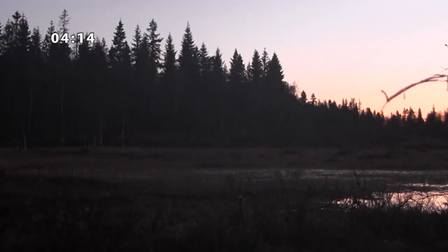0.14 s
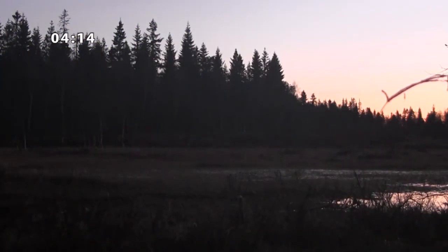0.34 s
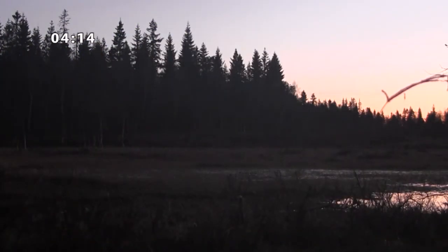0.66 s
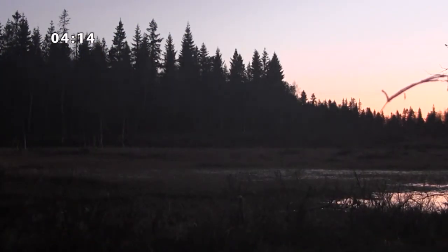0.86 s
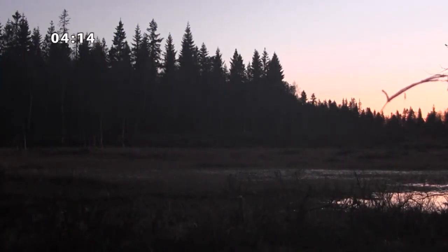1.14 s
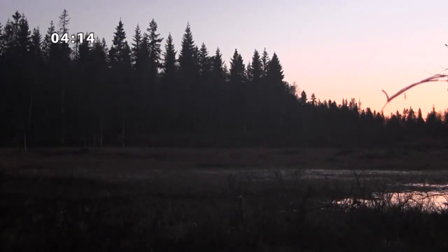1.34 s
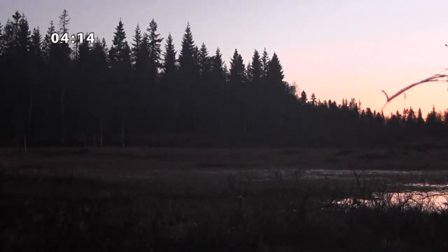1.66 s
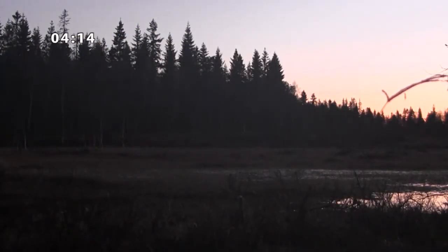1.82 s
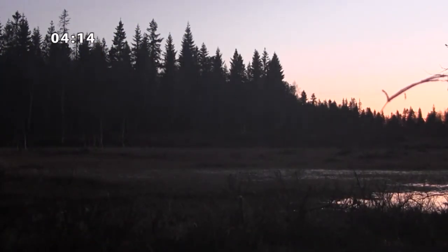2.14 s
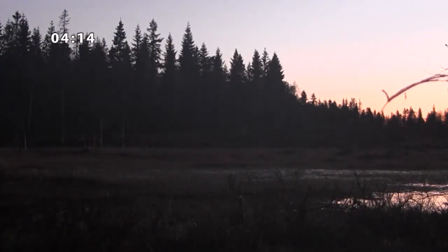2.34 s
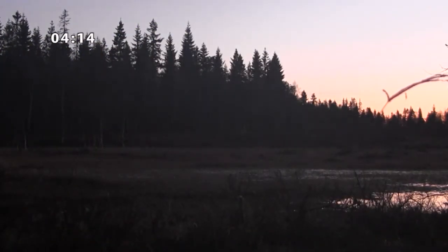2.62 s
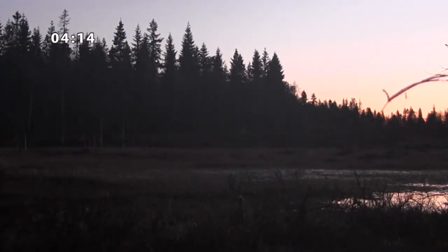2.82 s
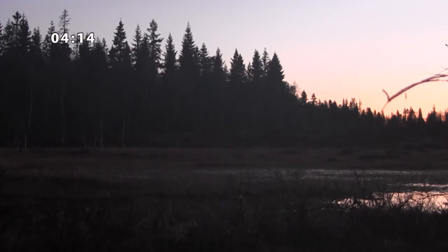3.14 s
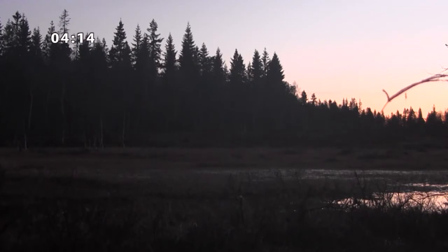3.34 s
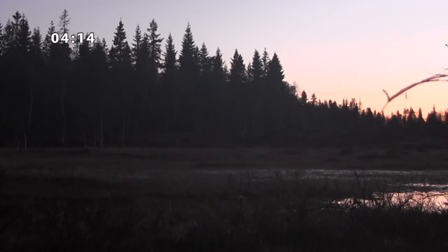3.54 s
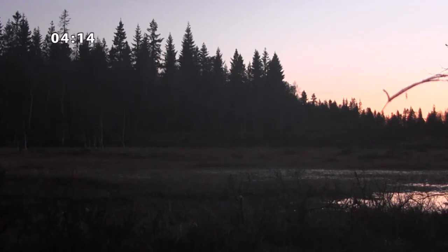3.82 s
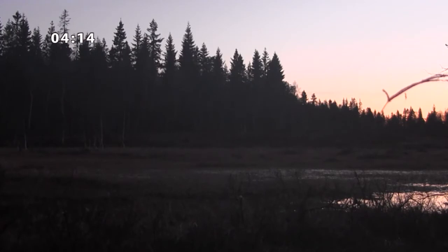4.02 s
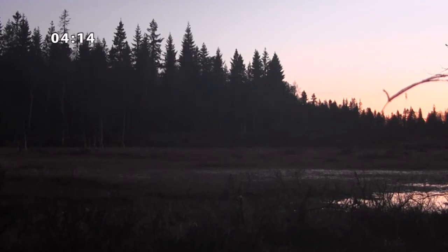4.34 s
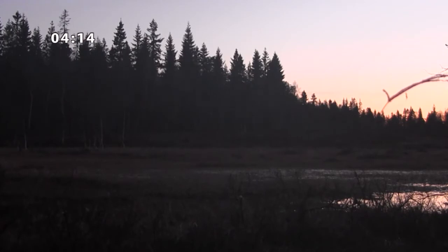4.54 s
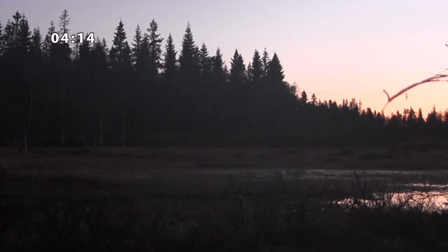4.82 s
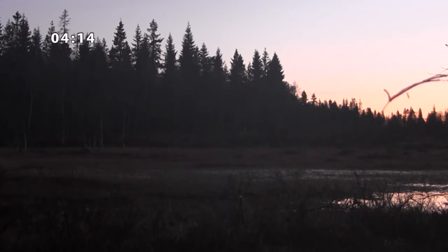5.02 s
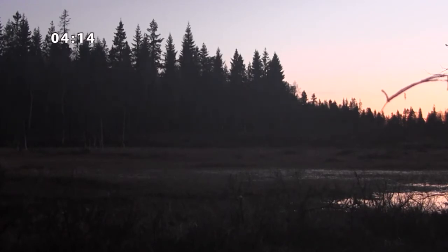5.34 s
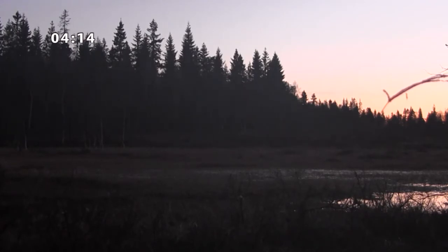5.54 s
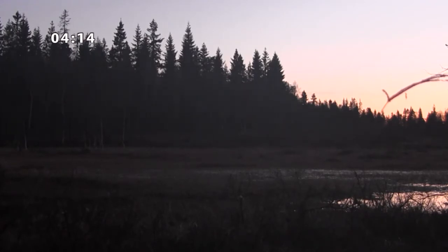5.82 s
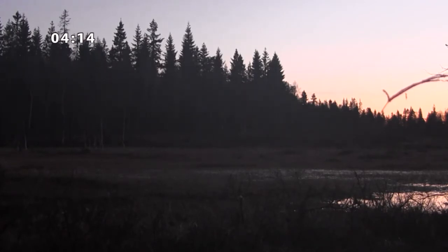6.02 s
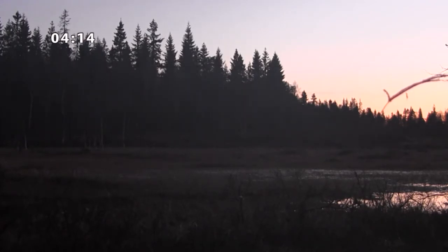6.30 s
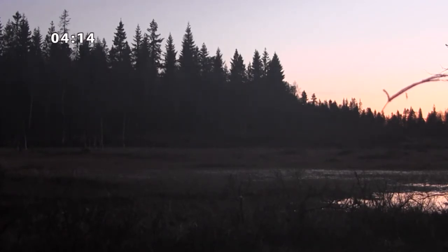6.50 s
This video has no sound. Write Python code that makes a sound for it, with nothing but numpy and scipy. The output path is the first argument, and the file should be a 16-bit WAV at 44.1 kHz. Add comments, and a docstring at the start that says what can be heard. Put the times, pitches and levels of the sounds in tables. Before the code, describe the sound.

Wide open bog at dawn beside a forest edge. Songbirds whistle, chip and trill on both sides over a murmur of distant birds, with black grouse bubbling low and very faint. A breathy grouse hiss swells and fades after two seconds; the chorus thins. Later three rapid double wing claps, then a loud harsh rasp and a shorter, weaker one at the end. Thin, bass-light stereo microphones with slight hiss and woodland echo.

```python
"""An open bog at dawn. Black grouse bubble far off: wavering tones that follow a curve of pitch.
Songbirds whistle, chip and trill from the forest edge, over a murmur and bursts of filtered noise with twitters.
A noise hiss swells and fades, wings clap three times as double bursts of noise,
and two harsh rasping calls sound nearer by: uneven slaps that ring throat resonances.
Trees scatter the voices and claps back; the microphone pair is thin in the bass and hisses faintly."""
import sys
import numpy as np
from scipy import signal
from scipy.fft import rfft, irfft
from scipy.io import wavfile
from scipy.ndimage import uniform_filter1d

SR = 44100
rng = np.random.default_rng(int(sys.argv[2]) if len(sys.argv) > 2 else 0)


def to_wav(sig):
    """Store sig (one row per channel, or 1-D mono) as 16-bit WAV at the path in sys.argv[1].

    Samples outside -1..1 are clipped; the rate is SR.
    """
    pcm = np.clip(np.atleast_2d(sig), -1, 1) * 32767
    pcm = np.round(pcm).astype(np.int16)
    wavfile.write(sys.argv[1], SR, pcm.T)  # frames by channels


N = 294147
TIME = np.arange(N) / SR

# How far the left microphone leads the right one in phase.
# Each row: frequency in Hz, lead in radians.
PORT_PHASE = [(2000, -0.17), (4300, 2), (12000, 5.5)]
# Bursts of noise in a band: far blurred calls, hiss around the wing claps, low hiss around the rasps.
# Each row: start in seconds, length in seconds, lowest Hz, highest Hz, level in dB.
BAND_BURSTS = [(0.935, 0.22, 4410, 4840, -52), (1.218, 0.28, 3830, 4280, -50.5),
               (1.576, 0.73, 2425, 3740, -51), (2.76, 0.62, 2365, 3930, -43), (3.081, 0.9, 1839, 2125, -55),
               (3.069, 0.45, 3880, 4600, -51), (3.19, 0.99, 3300, 3670, -49.5),
               (3.657, 0.81, 2523, 3070, -47), (4.082, 0.91, 1037, 1570, -62.5),
               (4.45, 0.39, 1890, 5530, -44.5), (4.822, 0.16, 2920, 3750, -49),
               (4.994, 0.29, 2370, 4630, -44), (5.42, 0.27, 2430, 2600, -48),
               (5.955, 0.64, 2620, 6806, -48), (6.21, 0.57, 3758, 4390, -49),
               (6.081, 0.95, 1130, 1626, -55.5)]

# Grouse: a coo lifts quickly from a low note, holds, then drops back to it
COO_RISE_S, COO_DROP_S = 0.013, 0.0373
COO_END_HZ = 514.5  # before the pitch factor of each phrase
COO_DB, COO_GROWTH_DB_PER_S = -57.5, 0.2  # the phrase grows a little louder as it goes
# the rest of the lek, bubbling far away
BUBBLES_PER_S, BUBBLE_S = 9, 0.0497
BUBBLE_DB, BUBBLE_SPREAD_DB = -69, -2
BUBBLE_LOW_HZ, BUBBLE_HIGH_HZ = 523.6, 647.3

# Songbirds: the fainter a note, the more of it arrives scattered by the trees
NEAR_DB, FAR_DB, FAR_SCATTER, SCATTER_S = -34.5, -42, 0.45, 0.067
FAR_WAVER = 0.0067  # far whistles also waver more in pitch
WHISTLE_ROUNDNESS = 0.75
SWELL_DB, SWELL_DB_PER_HZ = 3, 0.05  # rising whistles swell the most
# a chip dives to this share of its pitch; a long one then hooks back up
CHIP_LOW, CHIP_TURN_S, CHIP_SWELL_DB = 0.73, 0.036, -3.5
# a trill narrows, rises and swells as it goes
TRILL_NARROWING, TRILL_RISE_HZ, TRILL_SWELL_DB = 0.46, 91.3, 1.5

# Single notes in the band of each noise burst
TWITTER_PER_S, TWITTER_S, TWITTER_GLIDE, TWITTER_DB = 16, 0.0393, 0.046, -1.5

# The long hiss swells, holds and dies away
HISS_START_S, HISS_ATTACK_S, HISS_HOLD_S, HISS_RELEASE_S = 2.157, 0.18, 0.24, 0.24
HISS_DB = -32.5

# Each wing beat is a double clap
CLAP_GAP_S, FIRST_CLAP_DB, FIRST_DECAY_S, SECOND_DECAY_S = 0.023, -2.5, 0.014, 0.013

# Rasps: the membranes slap unevenly
RASP_PULSE_HZ, RASP_JITTER, THROAT_HALF_WIDTH_HZ = 172, 0.2463, 149
RASP_RUSH = 0.065  # turbulence between the slaps, per sample, against a slap of 1
RASP_DB, RASP_RELEASE_S = 0, 0.0062
# the upper resonances fade as the throat sinks below its open pitch
OPEN_HZ, UPPER_DB_PER_HZ = 1792, 0.06
# the second throat resonance (at the open pitch) follows the first; the third stays put
UPPER_HZ, UPPER_FOLLOWS, TOP_HZ, TOP_DB = 2183, 0.408, 2755, -18.5
SKIRT_DB_PER_HZ = -0.0231  # the rasp's skirt of hiss grows as the throat sinks

EDGE_HZ = 15850  # the sound stops above this


def gain_of(db):
    """Decibels to gain."""
    return 10 ** (np.asarray(db) / 20)


def evened(x):
    """Scales to rms 1."""
    return x / np.sqrt(np.mean(abs(x) ** 2) + 1e-20)


def read(points, hz):
    """Reads a curve between its points on a log-frequency axis."""
    f, value = np.transpose(points)
    return np.interp(np.log(hz + 1), np.log(f + 1), value)


def add(mix, s, sound):
    """Mixes a stereo sound in at time s, cutting off what falls outside."""
    at = round(s * SR)
    sound = sound[:, max(-at, 0):]
    part = mix[:, max(at, 0):][:, :sound.shape[1]]
    part += sound[:, :part.shape[1]]


def wander(size, hz):
    """Smooth random drift, mostly slower than hz, with rms 1 over a second."""
    f = np.fft.rfftfreq(SR, 1 / SR)
    slow = rfft(rng.standard_normal(SR)) / (1 + (f / hz) ** 4)
    return evened(irfft(slow))[:size]


def place(analytic, pan_db, lag_rad=0):
    """Puts a complex tone on the two microphones with a level and phase difference."""
    loudness = evened(gain_of([pan_db / 2, -pan_db / 2]))
    sides = loudness * np.exp(.5j * np.array([lag_rad, -lag_rad]))
    return np.sqrt(2) * (sides[:, None] * analytic).real


def port_lag(hz, pan_db, delay_s=7e-5):
    """Phase between the microphones for a bird on one side: a fixed delay turns faster at high pitch."""
    return -2 * np.pi * hz * delay_s * np.tanh(pan_db / 2)


def noise(colour, patchy_db=0, likeness=1):
    """Stereo noise of rms 1 with a given spectrum and drifting narrow patches."""
    # How alike left and right are, before the factor "likeness".
    # Each row: frequency in Hz, likeness from 0 to 1.
    likeness_curve = [(600, 0.68), (2500, 0.18)]
    frames, hz = N // 256 + 5, np.fft.rfftfreq(1024, 1 / SR)
    a, b, c, d, patches = rng.standard_normal((5, frames, len(hz)))
    patches = uniform_filter1d(patches, size=14, axis=0)  # smooth in time
    patches = evened(uniform_filter1d(patches, size=5, axis=1))  # and in pitch
    same = np.clip(likeness * read(likeness_curve, hz), 0, .98)
    left = a + 1j * b
    right = same * left + np.sqrt(1 - same ** 2) * (c + 1j * d)
    right = right * np.exp(-1j * read(PORT_PHASE, hz))
    below_db = 14 * np.minimum(np.log2((hz + 1) / colour[0][0]), 0)  # falls away under the lowest point
    z = np.array([left, right]) * gain_of(read(colour, hz) + below_db + patchy_db * patches)
    sound = signal.istft(z, nperseg=1024, noverlap=768, time_axis=-2, freq_axis=-1)[1]
    return evened(sound[:, :N])


def level(rows):
    """A dB curve as a gain for every sample."""
    return gain_of(np.interp(TIME, *np.transpose(rows)))


def arch(size, start, middle, end):
    """A smooth pitch sweep through three points."""
    return np.polyval(np.polyfit([0, .5, 1], [start, middle, end], 2), np.linspace(0, 1, size))


def syllable(hz, swell_db=0, roundness=1, jitter=0.0048, flutter_db=2):
    """A nearly pure, slightly unsteady tone that follows a pitch curve; it grows and fades like a spindle."""
    size = len(hz)
    turns = np.cumsum(hz * (1 + jitter * wander(size, 126))) / SR
    progress = np.linspace(-.5, .5, size)
    spindle = abs(np.cos(np.pi * progress)) ** roundness
    shape = spindle * gain_of(swell_db * progress + flutter_db * wander(size, 50))
    return evened(shape) * np.exp(2j * np.pi * turns)


def coo(length, top_hz, end_hz):
    """One hollow note that lifts to its top, holds and drops away."""
    t = np.arange(0, length, 1 / SR)
    drop_s = min(COO_DROP_S, length - COO_RISE_S)
    sag = np.maximum(1 - t / COO_RISE_S, 0) ** 2 + np.maximum(1 - (length - t) / drop_s, 0) ** 2
    return syllable(top_hz + (end_hz - top_hz) * sag, roundness=0.73, flutter_db=4.0)


def grouse(drop=0.872):
    """Near and far cocks run through the same phrase of coos, over the random bubbling of the others."""
    # The phrases of near and far cocks. Each row: start in seconds, level in dB against the usual coo,
    # pitch factor, slowness factor, left-right difference in dB.
    phrases = [(-.615, 3.5, .975, 1, 7), (1.39, -10, .8, 1, 0), (2.21, -3.5, .94, 1.04, 0),
               (3.84, .5, 1, 1, 8)]
    # The coos of the bubbling phrase. Each row: seconds into the phrase (before the slowness factor),
    # length in seconds, top pitch in Hz (before the pitch factor).
    phrase_coos = [(.005, 0.04, 613), (0.066, .057, 682), (0.131, .05, 700), (0.197, .032, 698),
                   (0.464, 0.052, 673), (0.579, .032, 703), (0.701, .062, 665), (0.791, .046, 589),
                   (0.867, 0.046, 682), (0.896, .135, 630.4), (1.205, .053, 672.4), (1.285, .032, 698),
                   (1.372, 0.059, 607.5), (1.459, .048, 630), (1.517, .062, 667), (1.705, 0.049, 610.5)]
    out = np.zeros((2, N))
    for start, far_db, factor, slowness, pan_db in phrases:
        for s, length, top_hz in phrase_coos:
            db = COO_DB + COO_GROWTH_DB_PER_S * s + far_db
            note = coo(length, factor * top_hz, factor * COO_END_HZ)
            add(out, start + slowness * s, gain_of(db) * place(note, pan_db, -1.97))
    chances = rng.random((round(BUBBLES_PER_S * N / SR), 4))
    for k, (when, height, strength, side) in enumerate(chances):
        top_hz = BUBBLE_LOW_HZ + (BUBBLE_HIGH_HZ - BUBBLE_LOW_HZ) * height
        db = BUBBLE_DB + BUBBLE_SPREAD_DB * (2 * strength - 1)
        note = coo(BUBBLE_S, top_hz, drop * top_hz)
        add(out, (k + when) / BUBBLES_PER_S, gain_of(db) * place(note, 10 * side, -np.pi * side))
    return out


def farness(db):
    """0 for a loud, near note, 1 for a faint, far one."""
    return np.clip((db - NEAR_DB) / (FAR_DB - NEAR_DB), 0, 1)


def from_trees(note, hz, db, pan_db):
    """A note as it arrives: partly direct, partly smeared by the branches on its way."""
    direct = gain_of(db) * place(note, pan_db, port_lag(hz, pan_db))
    age = np.arange(SR // 5) / SR
    branches = rng.standard_normal((2, len(age))) * np.exp(-age / SCATTER_S)
    smear = signal.fftconvolve(direct, branches, axes=1)
    share = np.clip(FAR_SCATTER * farness(db), 0, 1)  # the smeared part of the energy
    out = smear * np.sqrt(share) * np.linalg.norm(direct) / np.linalg.norm(smear)
    add(out, 0, np.sqrt(1 - share) * direct)
    return out


def songbirds():
    """Slurred whistles, quick chips, and trills whose pitch bounces in uneven arches."""
    # All levels here are relative: the whole group is turned down together at the end.
    # Slurred whistles. Each row: start in seconds, length in seconds, start Hz, middle Hz, end Hz,
    # relative level in dB, left-right difference in dB.
    whistles = [(0, 0.11, 1641, 1825, 1852, -29, 13), (0.225, .013, 3520, 3010, 3600, -32.5, -9),
                (0.258, .01, 1900, 2220, 2780, -31.5, 12), (0.289, .015, 2730, 2970, 3200, -25, -9),
                (0.302, 0.036, 2950, 3420, 3110, -36, -3), (.404, 0.012, 2650, 2910, 3230, -36.5, 4),
                (.486, 0.056, 1913, 1690, 1550, -40.5, -15), (0.562, 0.074, 1700, 1917, 1917, -30.5, -14),
                (0.614, 0.13, 3500, 3123, 2980, -36.5, 18), (0.865, .13, 2740, 2910, 2774, -31.5, -19),
                (.885, 0.12, 2380, 2400, 2194, -31, -19), (1.261, 0.032, 2140, 1987, 1750, -32, -17),
                (1.369, 0.093, 2025, 1988, 1985, -24.5, -14), (1.501, 0.13, 2480, 2518, 2873, -25, -19),
                (1.737, 0.091, 1480, 1840, 1960, -35.5, -3), (2.112, .12, 2790, 2779, 2778, -25.5, -0.5),
                (2.275, 0.059, 2780, 2797, 2760, -33.5, -0.5), (2.32, 0.069, 2488, 2493, 2534, -32, -1.5),
                (2.52, .098, 2313, 2795, 2983, -27.5, -14), (2.769, .27, 3750, 4336, 3600, -32.5, -4),
                (3.292, 0.25, 2360, 2424, 2306, -41, 0.5), (3.502, 0.085, 2218, 2760, 3160, -38, -2),
                (3.576, .076, 3400, 3403, 3240, -32.5, 1.5), (3.679, 0.11, 2465, 2783, 2970, -30, -16),
                (3.872, 0.014, 4200, 4370, 4160, -39.5, -2), (3.881, .11, 1940, 1944, 1848, -36, 10.5),
                (3.898, 0.03, 3280, 3320, 3460, -38, 0), (3.964, 0.23, 3964, 4223, 3777, -35, -4),
                (3.996, .04, 4120, 3920, 3660, -37.5, -2.5), (4.145, 0.024, 4800, 4520, 4320, -38, -2),
                (4.155, .12, 4320, 4125, 3910, -35.5, -4), (4.544, .095, 1627, 1702, 1680, -37, 1),
                (4.764, .042, 2840, 3140, 2980, -35.5, -8), (4.775, 0.12, 2380, 1970, 1720, -34.5, -9),
                (4.881, 0.056, 2340, 2430, 2170, -39.5, 2), (4.954, .058, 2290, 2355, 2080, -38, 3),
                (5.073, 0.2, 2186, 2095, 2090, -36.5, -23), (5.385, 0.059, 2590, 2520, 2480, -37.5, -9),
                (5.56, 0.12, 1857, 1850, 1798, -40.5, 3), (5.672, 0.096, 2160, 2260, 2280, -33.5, 12),
                (6.075, 0.091, 1882, 1898, 1890, -35, 10), (6.331, .11, 1720, 1661, 1570, -39, 2.5)]
    # Chips, quick downward flicks. Each row: start in seconds, length in seconds, start Hz,
    # relative level in dB, left-right difference in dB.
    chips = [(0.283, 0.011, 3807, -28, -5), (0.294, 0.0097, 2860, -30.5, 9),
             (0.431, 0.014, 3910, -31.5, 11), (1.99, 0.035, 2090, -35.5, -0.5),
             (2.024, 0.016, 3490, -35, -2), (2.387, 0.028, 3960, -29.5, -5),
             (2.413, 0.061, 3970, -31.5, -6), (2.703, 0.074, 4330, -33, -4.5),
             (3.556, 0.03, 3786, -35.5, -5)]
    # Trills. Each row: start in seconds, length in seconds, pitch in Hz, arches per second,
    # depth in Hz at the start, relative level in dB, left-right difference in dB.
    trills = [(0.633, 0.099, 1927, 25.4, 570, -38.5, -8), (0.717, 0.15, 2085, 43, 700, -33.5, 12),
              (.721, .15, 3030, 35.2, 199, -36.5, 7), (1.86, 0.21, 2110, 40, 218, -35.5, -1.5),
              (4.184, 0.075, 2100, 40, 550, -37, 9.5), (4.245, 0.166, 2198, 35, 230, -29.5, 23)]
    out = np.zeros((2, N))
    for s, length, start_hz, hz, end_hz, db, pan_db in whistles:
        pitch = arch(round(length * SR), start_hz, hz, end_hz)
        swell_db = SWELL_DB + SWELL_DB_PER_HZ * (end_hz - start_hz)
        waver = 0.0055 + FAR_WAVER * farness(db)
        note = syllable(pitch, swell_db, roundness=WHISTLE_ROUNDNESS, jitter=waver, flutter_db=0.5)
        add(out, s, from_trees(note, hz, db, pan_db))
    for s, length, hz, db, pan_db in chips:
        dive = (np.arange(0, length, 1 / SR) / min(length, CHIP_TURN_S) - 1) ** 2
        pitch = hz * (CHIP_LOW + (1 - CHIP_LOW) * dive)
        note = syllable(pitch, CHIP_SWELL_DB, roundness=0.32, jitter=0.04, flutter_db=2)
        add(out, s, from_trees(note, pitch.mean(), db, pan_db))
    for s, length, hz, rate, depth_hz, db, pan_db in trills:
        size = round(length * SR)
        arches = np.cumsum(rate * (1 + .13 * wander(size, 34.5))) / SR
        bounce = abs(np.sin(np.pi * arches)) - 2 / np.pi  # averages to about zero
        bend_hz = depth_hz * np.geomspace(1, TRILL_NARROWING, size) * bounce
        pitch = hz + TRILL_RISE_HZ * np.linspace(-.5, .5, size) + bend_hz
        note = syllable(pitch, TRILL_SWELL_DB, roundness=0.18, jitter=0.011, flutter_db=0.9)
        note = note * gain_of(0.03 * bend_hz)  # louder towards each top
        add(out, s, from_trees(evened(note), hz, db, pan_db))
    return gain_of(-2.5) * out


def far_chorus():
    """Many birds deep in the forest, smeared together into a murmur of patchy noise."""
    # Loudness of the murmur. Each row: time in seconds, level in dB.
    murmur_levels = [(0.0, -39.5), (0.38, -40.5), (0.81, -40), (1.01, -43.5), (1.86, -39), (2.54, -39),
                     (2.84, -56), (4.19, -54.5), (4.4, -41.5), (5.22, -45), (5.7, -42)]
    # Tone colour of the murmur. Each row: frequency in Hz, relative level in dB.
    murmur_colour = [(750, -24.5), (1450, -14.5), (1850, 0), (2300, 2), (3200, -8.5), (4500, -29.5)]
    murmur = noise(murmur_colour, patchy_db=3.5)
    return level(murmur_levels) * murmur


def air():
    """A faint steady noise: still air and microphone hiss."""
    # Tone colour of the air. Each row: frequency in Hz, relative level in dB.
    air_colour = [(150, -20), (330, -26.5), (480, -14), (1000, 2), (2000, -4), (5500, -1.5), (11000, -7),
                  (15500, -3.5)]
    return gain_of(-51.0) * noise(air_colour, patchy_db=2.5, likeness=0.69)


def forest(x, near=4.3, near_s=0.04):
    """Trunks scatter the sound back as sparse echoes, the nearest loudest, each band dying at its own speed."""
    # How long echoes last. Each row: frequency in Hz, seconds to fall by 60 dB.
    dying_times = [(500, 5.3), (2000, 2.9), (9000, 1.8)]
    age = np.arange(SR) / SR
    hits = rng.random((2, SR)) < 1500 / SR  # about 1500 echoes a second
    taps = rng.standard_normal((2, SR)) * hits * (age > .006)
    taps = taps * (1 + near * np.exp(-age / near_s))
    hz, t, z = signal.stft(taps, SR, nperseg=256)
    fade = gain_of(-60 * t / read(dying_times, hz)[:, None])
    tail = signal.istft(z * fade, SR, nperseg=256)[1]
    crossed = x + 0.47 * x[::-1]  # each side also hears some of the other
    return signal.fftconvolve(crossed, tail / np.linalg.norm(tail[0]), axes=1)[:, :N]


def band_bursts(rise_s=0.0065):
    """Bursts of noise, each in its own band: every one rises quickly, flutters and dies away."""
    out, hz = np.zeros((2, N)), np.fft.rfftfreq(SR, 1 / SR)
    for s, length, low_hz, high_hz, db in BAND_BURSTS:
        size = round(length * SR)
        band = 1 / (1 + (low_hz / (hz + 1)) ** 24 + (hz / high_hz) ** 24)
        left, other = np.exp(2j * np.pi * rng.random((2, len(hz))))
        right = (left + 2 * other) / np.sqrt(1 + 2 ** 2)  # the right shares only part of the left
        right = right * np.exp(-1j * read(PORT_PHASE, hz))
        burst = irfft(np.array([left, right]) * band)[:, :size]
        rise = 1 - np.exp(-np.arange(size) / SR / rise_s)
        shape = rise * np.linspace(1, 0, size) * gain_of(1.2 * wander(size, 60))
        add(out, s, gain_of(db) * evened(burst * shape))
    return out


def twitters(spread_db=5):
    """Short random gliding notes in the band of each noise burst, fading with it."""
    out = np.zeros((2, N))
    for s, length, low_hz, high_hz, db in BAND_BURSTS:
        for when, height, slope, side in rng.random((round(TWITTER_PER_S * length), 4)):
            hz = low_hz * (high_hz / low_hz) ** (height ** 2)  # low notes are more common
            glide = TWITTER_GLIDE * (2 * slope - 1)
            pan_db = spread_db * (2 * side - 1)
            pitch = hz * np.linspace(1 - glide, 1 + glide, round(TWITTER_S * SR))
            note = place(syllable(pitch, roundness=1.0), pan_db, port_lag(hz, pan_db))
            add(out, s + when * length, gain_of(db + TWITTER_DB) * (1 - when) * note)
    return out


def hiss():
    """A long hiss from across the bog: shaped noise that swells, holds and dies away."""
    # Tone colour of the hiss. Each row: frequency in Hz, relative level in dB.
    hiss_colour = [(500, -51), (900, -17.5), (1500, -6), (4200, -5.5), (5300, 3), (7600, -19), (9500, -21),
                   (12000, -32.5)]
    age = TIME - HISS_START_S
    swell = np.clip(age / HISS_ATTACK_S, 0, 1)
    fade = np.exp(-np.maximum(age - HISS_ATTACK_S - HISS_HOLD_S, 0) / HISS_RELEASE_S)
    return gain_of(HISS_DB) * swell * fade * noise(hiss_colour, patchy_db=1.5, likeness=1.05)


def wings():
    """Each stroke of the feathers is a short burst of noise: a softer one, then a stronger one."""
    # The wing beats. Each row: time in seconds, relative level in dB.
    beats = [(4.418, -26), (4.522, -22), (4.638, -23.5)]
    # Tone colour of a clap. Each row: frequency in Hz, relative level in dB.
    clap_colour = [(600, -80), (1200, -10.5), (2700, 7.5), (3100, -2), (4500, 8), (5500, -4), (8000, -25),
                   (13000, -57)]
    strokes = np.zeros(N)
    pair = (0, FIRST_CLAP_DB, FIRST_DECAY_S), (CLAP_GAP_S, 0, SECOND_DECAY_S)
    for s, db in beats:
        for delay, clap_db, decay in pair:
            age = np.maximum(TIME - s - delay, 0)
            strokes += gain_of(db + clap_db) * (1 - np.exp(-age / 0.00091)) * np.exp(-age / decay)
    lean = gain_of([[-1], [1]])  # a little louder on the right
    return strokes * noise(clap_colour, patchy_db=-0.5, likeness=1.9) * lean


def ring(slaps, hz):
    """Slaps and turbulence ring one throat resonance, which may move, at chance phases."""
    drive = (slaps + RASP_RUSH) * np.exp(2j * np.pi * rng.random(SR))[:len(slaps)]
    swing = signal.sosfilt(signal.butter(4, THROAT_HALF_WIDTH_HZ, fs=SR, output="sos"), drive)
    return evened(swing) * np.exp(2j * np.pi * np.cumsum(hz * np.ones(len(slaps))) / SR)


def rasps():
    """A harsh voice: uneven slaps ring three throat resonances, with a skirt of hiss."""
    # The harsh calls, one table each. Each row: time in seconds, level in dB (of the voice alone),
    # lowest throat resonance in Hz.
    harsh_calls = [
        [(5.732, -34, 1750), (5.744, -21, 1840), (5.766, -18.5, 1783), (5.845, -23, 1680), (5.872, -29.5, 1642),
         (5.925, -25.5, 1652), (6.0, -20, 1800), (6.068, -26.5, 1755)],
        [(6.562, -36, 1634), (6.574, -24, 1594), (6.638, -25.5, 1654), (6.67, -26, 1594)],
    ]
    # Tone colour of the skirt of hiss. Each row: frequency in Hz, relative level in dB.
    skirt_colour = [(1000, -23), (1500, 5.5), (2400, 0), (2800, 8), (3150, -6), (3500, 2.5), (4100, -0.5),
                    (6500, -32)]
    out, effort = np.zeros((2, N)), np.zeros(N)
    for rows in harsh_calls:
        s, *columns = np.transpose(rows)
        t = np.arange(s[0], s[-1] + RASP_RELEASE_S, 1 / SR)
        release = np.minimum((t[-1] - t) / RASP_RELEASE_S, 1)
        db, hz = (np.interp(t, s, c) for c in columns)
        turns = np.cumsum(RASP_PULSE_HZ * (1 + RASP_JITTER * wander(len(t), RASP_PULSE_HZ))) / SR
        slaps = np.diff(np.floor(turns), prepend=-1) > 0  # one slap per full turn
        share = gain_of(UPPER_DB_PER_HZ * (hz - OPEN_HZ))
        second = ring(slaps, UPPER_HZ + UPPER_FOLLOWS * (hz - OPEN_HZ))
        upper = second + gain_of(TOP_DB) * ring(slaps, TOP_HZ)
        voice = (ring(slaps, hz) + share * upper) / np.sqrt(1 + share ** 2)
        voice = evened(voice / np.sqrt(1 + 0.065 * abs(voice) ** 2))  # the membranes can swing only so far
        add(out, s[0], release * gain_of(db + RASP_DB) * place(voice, 5.3, -0.12))
        skirt_db = columns[0] + SKIRT_DB_PER_HZ * (columns[1] - OPEN_HZ)
        effort += gain_of(np.interp(TIME, s, skirt_db, left=-np.inf, right=-np.inf))  # silent outside
    skirt = noise(skirt_colour, patchy_db=2.5)
    return out + gain_of(-18.5) * effort * skirt


def scene():
    """All the birds, the noise bursts, the echoes and the air."""
    coos, songs, notes = grouse(), songbirds(), twitters()
    claps, calls = wings(), rasps()
    # how strongly the trees answer each source
    to_trees = gain_of(-10.5) * coos + gain_of(-8.5) * songs + gain_of(-4.5) * notes
    to_trees += gain_of(-6.5) * claps + gain_of(-11.0) * calls
    voices = coos + songs + notes + claps + calls
    return voices + forest(to_trees) + far_chorus() + air() + band_bursts() + hiss()


def record(dry):
    """The microphones shed the bass; then a steep filter removes the highest treble."""
    thin = signal.sosfilt(signal.butter(3, 330, "high", fs=SR, output="sos"), dry)
    band_limit = signal.firwin(511, EDGE_HZ, window=("kaiser", 9), fs=SR)
    return signal.oaconvolve(thin, band_limit[None], "same")


dry = scene()
out = record(dry)
to_wav(out)
```